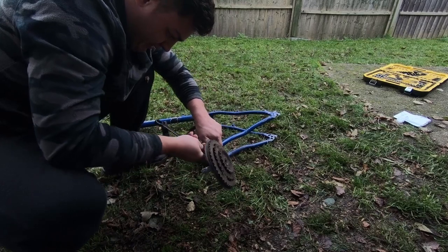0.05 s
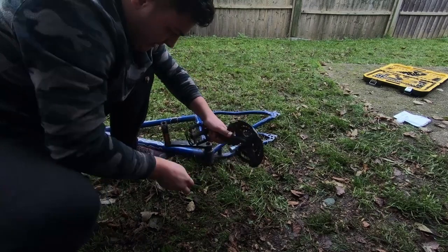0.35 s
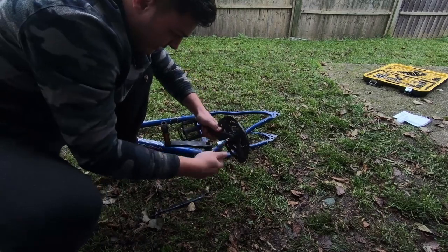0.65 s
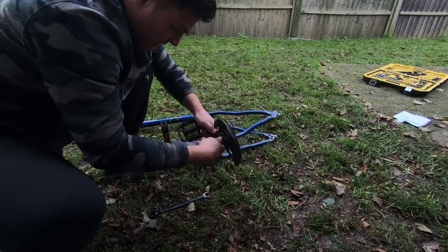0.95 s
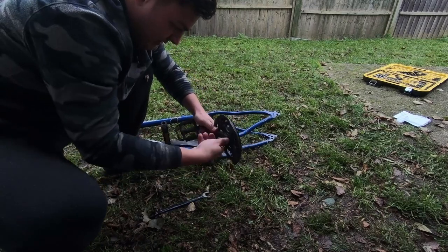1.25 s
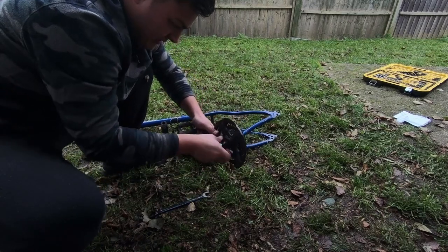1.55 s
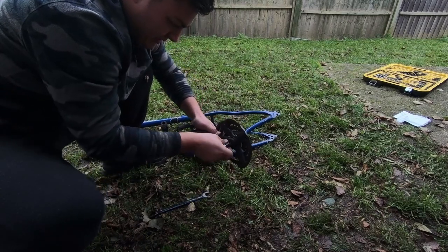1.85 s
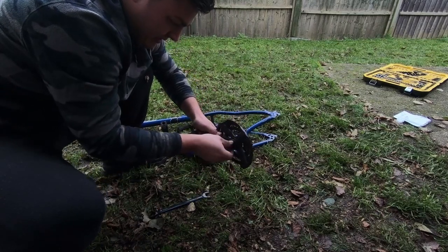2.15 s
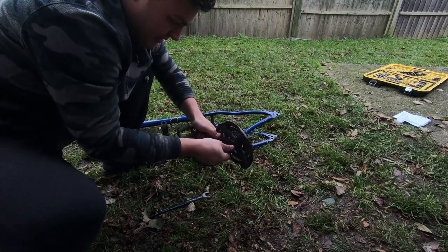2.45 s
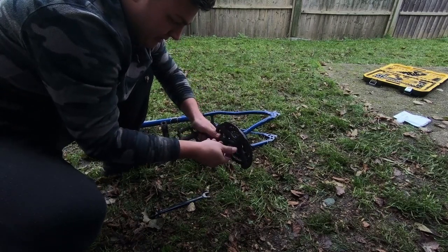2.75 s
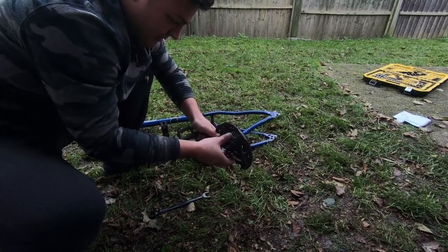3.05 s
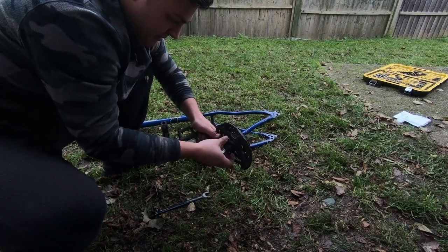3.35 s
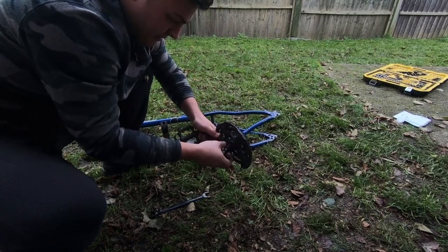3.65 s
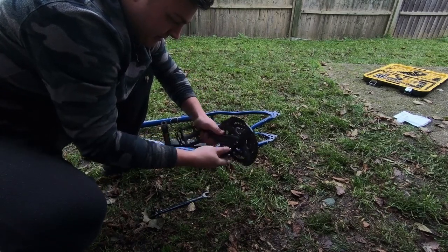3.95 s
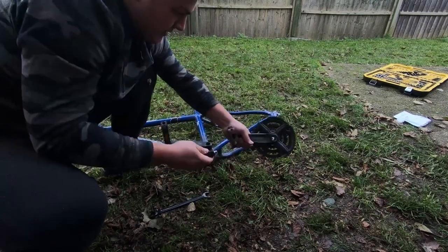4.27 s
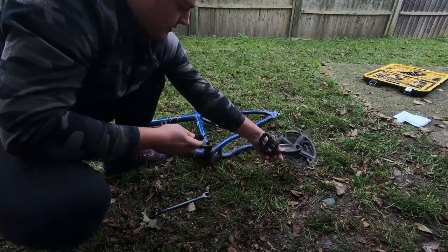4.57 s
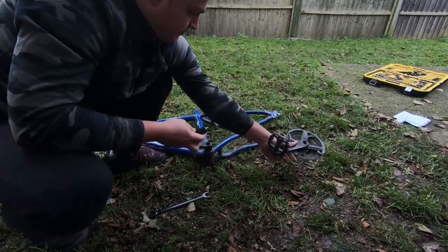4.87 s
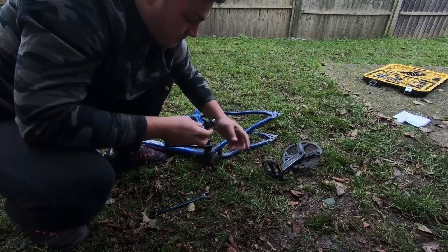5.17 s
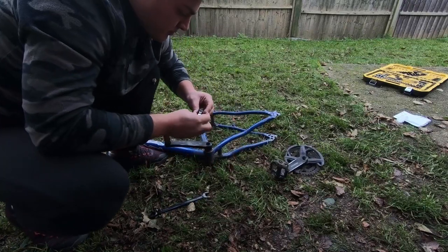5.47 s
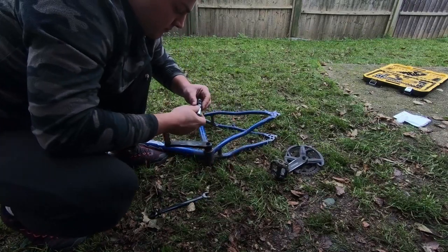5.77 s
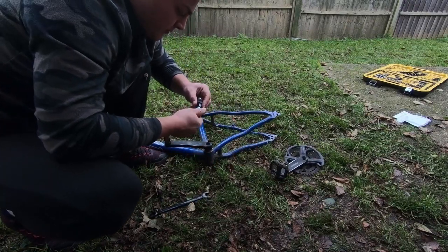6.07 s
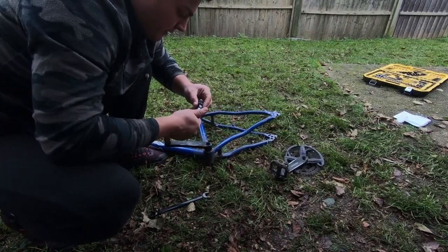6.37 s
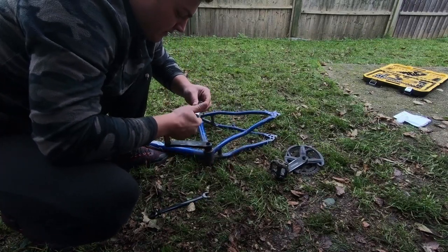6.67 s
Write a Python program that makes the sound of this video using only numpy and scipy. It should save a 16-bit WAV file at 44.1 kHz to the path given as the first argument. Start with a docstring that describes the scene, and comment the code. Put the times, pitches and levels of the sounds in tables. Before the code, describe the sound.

Right at the start, a steel wrench clinks sharply on a bicycle crank and chatters to rest within about 0.2 seconds, the brightest and loudest metal sound. From 0.6 to 4 seconds the crank is wiggled off its axle by hand, giving much quieter, irregular dry knocks and short scrapes, with a clearer ringing ping near 3.8 seconds. Soft, dull bumps on the lawn come around 2 and 3 seconds. After that only a few faint ticks and pings sound, near 5.1, 5.9 and 6.2 seconds. The metalwork is close, with a very slight echo from a yard fence. Throughout, a distant engine drones deeply, slowly rising in pitch and strongest from 2 to 5 seconds, over low traffic rumble that swells around 6 seconds and a faint hiss. Dull wind puffs touch the right side of the microphone near 0.8 seconds and from 5.1 to 5.6 seconds.

```python
"""A steel wrench clinks on a bicycle crank and chatters to rest, each contact a noise burst plus ringing
modes. The loosened crank is worked off its axle by hand: dry knocks, scrapes, pings of the thin
chainring, soft bumps on the lawn. A fence echoes faintly; wind puffs catch the right microphone port.
A distant engine, a firing tone with three overtones, slowly gathers speed over low traffic noise."""
import sys
import numpy as np
from scipy import signal
from scipy.fft import rfft, irfft, next_fast_len
from scipy.io import wavfile
from scipy.ndimage import map_coordinates

SR = 44100
rng = np.random.default_rng(int(sys.argv[2]) if len(sys.argv) > 2 else 0)


def master(y):
    """Save y as 16-bit WAV."""
    cut = np.clip(np.atleast_2d(y).T, -1, 1)
    pcm = np.round(cut * 32767)  # scale
    wavfile.write(sys.argv[1], SR, pcm.astype(np.int16))


N = 300762

# left-right likeness of ambient and of metal sounds: freq_hz, correlation
AMBIENT_COHERENCE = [(60, 0.66), (130, 1), (270, 0.91), (580, 0.02), (1250, 0.038), (2660, 0.43),
                     (5690, 0.26), (12100, 0.09)]
METAL_COHERENCE = [(1000, 0.72), (4000, 1), (6400, 0.72), (9000, 0.51)]
# their balance: freq_hz, left_minus_right_db
AMBIENT_PAN = [(60, 1.5), (110, 1), (200, 1.5), (350, 7.5), (640, 1), (1150, 1.5), (2070, 0.5), (3730, 0.5),
               (6730, -1.5), (12100, -1.5)]
METAL_PAN = [(1000, 2.5), (2000, -4), (4500, 0), (6400, 0), (8500, -5.5), (12000, -4)]


def amp(db):
    """Decibels to gain."""
    return 10 ** (np.asarray(db) / 20)


def unit(x):
    """Scale to rms 1."""
    return x / np.sqrt(np.mean(x ** 2) + 1e-20)


def along(points, hz):
    """Interpolate (freq_hz, value) rows on a log axis."""
    freq_hz, values = np.transpose(points)
    return np.interp(np.log(hz + 1), np.log(freq_hz + 1), values)


def curves(rows):
    """One per-sample curve for each column after time_s."""
    time_s, *columns = np.transpose(rows)
    return [np.interp(np.arange(N) / SR, time_s, column) for column in columns]


def wobble(knots_per_s):
    """Smooth random curve, rms near 1."""
    knots = rng.standard_normal(int(N * knots_per_s / SR) + 4)
    return map_coordinates(knots, [np.arange(N) * knots_per_s / SR])


def rise(t, attack_s):
    """Smooth step from 0 to 1."""
    return 1 - np.exp(-(t / attack_s) ** 2)


def fade(t, t60_s):
    """Exponential decay."""
    return np.exp(-np.log(1000) * t / t60_s)


def bell(t, length_s):
    """Gaussian swell centred on t = 0."""
    return np.exp(-2 * (t / length_s) ** 2)


def swells(rows):
    """Gain curve of summed bells."""
    t = np.arange(N) / SR
    return sum(amp(level_db) * bell(t - centre_s, length_s) for centre_s, length_s, level_db in rows)


def add(track, start_s, sound):
    """Mix a sound in at start_s."""
    part = track[:, max(round(start_s * SR), 0):][:, :sound.shape[1]]
    part += sound[:, :part.shape[1]]


def noise(spectrum, coherence=AMBIENT_COHERENCE, pan=AMBIENT_PAN, size=N, tilt_db_per_oct=0):
    """Coloured stereo noise, rms 1."""
    n_fft = next_fast_len(size)
    hz = np.fft.rfftfreq(n_fft, 1 / SR)
    width_rad = np.arccos(np.clip(along(coherence, hz), -1, 1)) / 2
    colour = amp(along(spectrum, hz) + tilt_db_per_oct * np.log2(hz + 1))
    mid, side = rfft(rng.standard_normal((2, n_fft))) * colour * [np.cos(width_rad), np.sin(width_rad)]
    balance = amp(np.outer([.5, -.5], along(pan, hz)))
    return unit(irfft(np.array([mid + side, mid - side]) * balance, n_fft)[:, :size])


def ring(modes, t, width, scatter_db=1.5):
    """Decaying metal modes; each reaches the two microphones at its own phase."""
    hz, level_db, t60_s = np.transpose(modes)
    struck_db = level_db + scatter_db * rng.standard_normal(len(hz))
    stereo_db = struck_db + np.outer([.5, -.5], along(METAL_PAN, hz))
    apart_rad = width * np.arccos(np.clip(along(METAL_COHERENCE, hz), -1, 1))
    apart_rad *= rng.choice([-1, 1], len(hz))
    phase = rng.uniform(0, 2 * np.pi, len(hz)) + np.outer([.5, -.5], apart_rad)
    waves = np.sin(2 * np.pi * hz[:, None] * t + phase[..., None]) * fade(t, t60_s[:, None])
    return np.sum(amp(stereo_db)[..., None] * waves, axis=1)


def wrench():
    """Faint high ringing, then strikes and bounces that jar the crank puller and ring the steel shank."""
    # start_s, clash_db, ring_db; row 0 is the faint high ringing just before the first strike
    clinks = [(.002, -41, -47.5), (0.0317, -21, -29.5), (.033, -15.5, -24.5), (.0384, -31, -30),
              (.044, -28.5, -24), (.0505, -33, -31), (.054, -32.5, -23.5), (.0583, -31, -25),
              (.085, -48.5, -43), (.098, -51, -42), (.116, -58.5, -45.5), (.17, -62, -52)]
    gap_s, loss_db = .0183, 6
    bounces = [(.067 + k * gap_s, -47 - k * loss_db, -42 - k * loss_db) for k in range(7)]
    # freq_hz, density_db
    clash_spectrum = [(500, -19.5), (1000, -21), (1650, -3), (2000, -10), (2400, -2.5), (2750, -14),
                      (3300, -0.5), (3850, -7), (4600, -1.5), (5130, 3.5), (5650, -7.5), (6300, -2),
                      (6680, 4), (7400, -11.5), (8000, -5.5), (8950, 0), (9700, -7), (10300, -29),
                      (12000, -20), (16000, -43)]
    # freq_hz, level_db, t60_s
    puller_modes = [(1620, -15, .02), (2450, -18, .03), (3290, -14, .02), (4600, -17, .02),
                    (5110, -6, .022), (6560, -4, .024), (6730, -2.5, .018), (8880, -8, .05),
                    (9600, -15, .018)]
    shank_modes = [(1530, -19, .06), (1593, -24, .08), (2299, -13, .06), (2503, -16, .24), (3289, -22, .05),
                   (3430, -23, .1), (4245, -11, .06), (4277, -17.5, .2), (4570, -12.5, .15),
                   (5158, -11, .075), (5995, -14, .16), (6230, -14, .14), (6346, 3, .165), (6386, -8, .24),
                   (6441, -8, .2), (6545, -9, .08), (6590, -13, .09), (6843, -13, .08), (7041, -23, .16),
                   (8495, -20, .08), (8910, -11.5, .115), (9320, -18, .07), (11300, -31, .11),
                   (11870, -30, .09), (12200, -34, .08), (15000, -34, .09)]
    out, t = np.zeros((2, N)), np.arange(SR // 3) / SR
    onset = rise(t, attack_s=.0003)
    burst_decay = fade(t, t60_s=.009) + amp(-15) * fade(t, t60_s=.18)
    damping = amp(-9 * rise(t, attack_s=.011))  # most of the ring dies early
    for start_s, clash_db, ring_db in clinks + bounces:
        burst = burst_decay * noise(clash_spectrum, METAL_COHERENCE, METAL_PAN, len(t))
        clash = amp(-2) * burst + ring(puller_modes, t, width=1.25)
        shank = damping * ring(shank_modes, t, width=1.25)
        add(out, start_s, onset * (amp(clash_db) * clash + amp(ring_db) * shank))
    return out


def yard_echo(x):
    """Fence and house scatter a short tail."""
    # freq_hz, t60_s
    decay_times = [(500, 0.19), (6000, 0.27), (12000, 0.17)]
    hz, t, bands = signal.stft(rng.standard_normal((2, SR // 2)), SR, nperseg=256)
    tail = signal.istft(bands * fade(t, along(decay_times, hz)[:, None]), SR, nperseg=256)[1]
    return signal.fftconvolve(x, tail / np.linalg.norm(tail[0]), axes=1)[:, :N]


def engine():
    """Only four harmonics carry from afar; lumpy pitch and strength smooth out as speed rises."""
    # time_s, firing_hz
    speed = [(0, 32), (.6, 33.7), (1.7, 38.4), (2.55, 41.3), (3.1, 44.2), (4.15, 49.4), (5.1, 53.3),
             (5.6, 54.8), (6.82, 55.2)]
    # firing tone: time_s, level_db
    firing_levels = [(0, -32), (.15, -23), (.38, -21.5), (.52, -30), (.65, -22.5), (.92, -28.5),
                     (1.08, -23), (1.25, -42), (1.42, -43.5), (1.7, -27.5), (2.1, -17), (2.9, -17.5),
                     (3.45, -14), (4.1, -19.5), (4.8, -17.5), (5.15, -23.5), (5.5, -41), (5.95, -24.5),
                     (6.2, -23.5), (6.45, -32), (6.68, -18.5), (6.82, -24.5)]
    # harmonics: time_s, second_db, third_db
    overtone_levels = [(0, -23, -46), (.25, -27.5, -32), (.4, -37, -39.5), (.62, -41, -32.5),
                       (1.02, -42.5, -33.5), (1.15, -36, -38), (1.5, -38, -41.5), (1.75, -33.5, -39),
                       (2.1, -30.5, -36), (2.35, -25, -38), (2.55, -30, -40), (2.7, -32, -44.5),
                       (3.05, -33.5, -56), (3.35, -38.5, -53), (3.8, -42.5, -51), (4.1, -34, -51.5),
                       (4.65, -33.5, -47), (5.05, -35, -52), (5.55, -42, -42), (5.85, -30, -46.5),
                       (6.15, -30.5, -43.5), (6.82, -34.5, -48)]
    # fourth harmonic: centre_s, length_s, level_db
    fourth_swell = [(4.5, 0.64, -52)]
    smoothing_hz, jitter_hz = 4.77, 1.973
    flutter_db, waver_db, surge_db = .5, 1.7, 3.5
    firing_hz, = curves(speed)
    lumpiness = np.exp((firing_hz[0] - firing_hz) / smoothing_hz)
    pitch_hz = firing_hz + jitter_hz * lumpiness * wobble(12)
    phase = 2 * np.pi * np.cumsum(pitch_hz) / SR + np.array([[.1], [-.1]])  # offset between ports
    first = amp(curves(firing_levels)[0] + flutter_db * wobble(9))
    second, third = amp(curves(overtone_levels))
    overtones = [gain * amp(waver_db * wobble(9)) for gain in (second, third, swells(fourth_swell))]
    surge = amp(surge_db * lumpiness * wobble(22))
    return surge * sum(np.sqrt(2) * gain * np.sin(k * phase + rng.uniform(0, 2 * np.pi))
                       for k, gain in enumerate([first] + overtones, 1))


def traffic():
    """Heavy vehicles rumble; one level curve drives the far rush of tyres and its airy top."""
    # time_s, level_db
    rumble_levels = [(0, -30), (.7, -30), (1.15, -31.5), (1.37, -29), (1.7, -29.5), (2.1, -28),
                     (2.6, -31.5), (3.0, -31.5), (3.45, -36.5), (4.1, -32), (4.7, -29), (5.15, -29.5),
                     (5.6, -26), (6.1, -25.5), (6.45, -26.5), (6.82, -28)]
    rush_levels = [(0.25, -64), (1.06, -64.5), (1.52, -61.5), (1.88, -60.5), (2.39, -65), (3.86, -67),
                   (4.78, -63.5), (5.42, -64), (6.7, -62.5)]
    # freq_hz, density_db
    rumble_spectrum = [(15, -10), (28, -4.5), (50, 2.5), (70, -2.5), (95, -5.5), (120, -9), (150, -13),
                       (175, -21.5), (210, -19), (250, -34), (400, -53), (1500, -140)]
    tyre_spectrum = [(100, -27), (205, 3), (260, -2), (360, -0.5), (450, -8.5), (560, -17), (900, -27),
                     (2000, -62.5), (6000, -120)]
    air_spectrum = [(200, -21), (600, 1), (1000, 0.5), (1600, 0), (2150, -2.5), (2550, -9), (3150, -10),
                    (4200, -21.5), (8000, -46.5), (13000, -76)]
    rumble_coherence = [(30, 1), (70, .98), (130, 1), (300, .63)]  # freq_hz, correlation
    rumble_db = curves(rumble_levels)[0] + 1.7 * wobble(17)
    rush_db, = curves(rush_levels)
    rumble = amp(rumble_db) * noise(rumble_spectrum, rumble_coherence)
    tyres = amp(rush_db + 10 + 1.3 * wobble(4)) * noise(tyre_spectrum)
    air = amp(rush_db + 2.5 + .2 * wobble(3.7)) * noise(air_spectrum)
    return rumble + tyres + air


def outdoor_hiss():
    """Faint high hiss, drifting in level."""
    # time_s, level_db
    levels = [(.3, -67.5), (1.1, -69.5), (1.7, -66.5), (2.4, -68.5), (3.2, -69), (3.9, -68.5), (4.6, -64.5),
              (5.4, -66), (6.1, -66.5), (6.7, -68.5)]
    # freq_hz, density_db
    spectrum = [(1800, -30.5), (2600, -4.5), (3150, 2.5), (3800, -5), (4600, -5), (6200, -0.5),
                (7200, -5.5), (8500, -18.5), (11000, -24), (13000, -42.5)]
    return amp(curves(levels)[0]) * noise(spectrum)


def axle_scrapes():
    """Each wiggle drags the crank along the axle: a swell of tiny uneven slips."""
    # centre_s, length_s, level_db, tilt_db_per_oct
    strokes = [(0.589, 0.031, -60.5, 7.5), (1.501, 0.091, -62.5, 2.5), (1.931, 0.26, -67.5, 5.5),
               (2.25, 0.1, -64.5, 0.5), (2.613, 0.042, -63, -2), (2.983, 0.067, -61, 0),
               (3.336, 0.032, -59, -1.5), (3.67, .056, -67, -1), (5.089, 0.024, -57.5, 4.5),
               (5.849, 0.025, -61, -2), (6.22, .055, -67.5, 3.5), (6.528, 0.04, -66.5, 3)]
    # steel on steel: freq_hz, density_db
    rasp_spectrum = [(600, -17), (1500, -1.5), (1950, 5), (2350, -3.5), (2900, 4.5), (3500, -3), (4300, -3),
                     (4850, -5.5), (5400, 2.5), (5950, -3.5), (6400, -1.5), (7300, -9.5), (7800, -7.5),
                     (8400, -21), (12000, -35.5), (16000, -59.5)]
    slip_db, slips_per_s = 2.3, 450
    out, t = np.zeros((2, N)), np.arange(-SR // 3, SR // 3) / SR
    for centre_s, length_s, level_db, tilt_db_per_oct in strokes:
        rasp = noise(rasp_spectrum, METAL_COHERENCE, METAL_PAN, len(t), tilt_db_per_oct)
        add(out, centre_s + t[0], amp(level_db) * bell(t, length_s) * rasp)
    return out * unit(amp(slip_db * wobble(slips_per_s)))


def crank_knocks():
    """The hand-damped crank knocks drily on its axle, brighter when harder; the chainring sings on."""
    # start_s, contact_db, ring_re_contact_db, spot_hz, spot_db
    knocks = [(.604, -44, -20, 2180, 17), (.6148, -42.5, -14, 5970, 7), (.8028, -50.5, -18, 2100, 12),
              (.8145, -58, -12, 6200, 14), (1.249, -55.5, -18, 2970, 4), (1.477, -54, -17, 3100, 7),
              (1.5295, -51.5, -11, 5300, 9), (1.781, -55, -20, 1900, 6), (1.851, -57, -18, 3300, 3),
              (1.863, -57, -15, 5600, 6), (1.908, -55, -18, 3100, 5), (1.959, -51.5, -20, 2010, 8),
              (1.984, -57, -18, 6500, 6), (2.273, -58, -18, 3000, 4), (2.503, -56, -18, 3000, 5),
              (2.582, -58, -18, 2000, 5), (2.618, -56.5, -17, 2000, 5), (2.6525, -54.5, -15, 2930, 5),
              (2.963, -54.5, -14, 2010, 8), (2.985, -53, -13, 5450, 9), (3.344, -52, -12, 1930, 11),
              (3.361, -57.5, -18, 2900, 9), (3.5835, -54.5, -20, 2900, 8), (3.7913, -42, -0.5, 5200, 8),
              (3.803, -54, -6, 8000, 18), (3.817, -61, -5, 6200, 9), (3.9025, -51, -24, 2970, 12),
              (3.9625, -58, -16, 5800, 5), (5.093, -56, -14.5, 6000, 3), (5.851, -55, -15, 3720, 6)]
    # contact noise: freq_hz, density_db
    knock_spectrum = [(400, -21.5), (1000, -3.5), (1500, -0.5), (2150, 1.5), (2550, -1.5), (3100, 3),
                      (4200, -4.5), (5900, -6), (7400, -9), (8600, -22), (10200, -26), (13000, -44.5),
                      (16000, -57.5)]
    # crank and axle: freq_hz, level_db, t60_s
    crank_modes = [(1500, -5, .035), (2990, -2.5, .04), (3270, -8, .06), (3850, -10, .025),
                   (4620, -11, .05), (5100, -3.5, .068), (5290, 3, .036), (5500, -6, .035),
                   (6056, -1.5, .072), (6220, -4.5, .08), (7386, -11, .08), (7850, -6, .08),
                   (8296, -12, .08), (8700, -15, .06), (9750, -14, .05), (10250, -16, .05),
                   (12150, -14, .045), (12850, -23, .03)]
    out, t = np.zeros((2, N)), np.arange(SR // 4) / SR
    onset = rise(t, attack_s=.00029)
    knock_decay = fade(t, t60_s=.031) + amp(-23) * fade(t, t60_s=.28)
    damping = amp(-7 * rise(t, attack_s=.0065))
    hz, spot_half_width_hz = np.geomspace(100, SR / 2, 400), 210
    for start_s, contact_db, ring_re_contact_db, spot_hz, spot_db in knocks:
        # each struck spot favours one band
        peak_db = spot_db / (1 + ((hz - spot_hz) / spot_half_width_hz) ** 2)
        spectrum = np.column_stack([hz, along(knock_spectrum, hz) + peak_db])
        tilt_db_per_oct = .86 * (contact_db + 51)
        burst = noise(spectrum, METAL_COHERENCE, METAL_PAN, len(t), tilt_db_per_oct)
        knock = amp(.5) * knock_decay * burst
        body = amp(ring_re_contact_db + 3) * damping * ring(crank_modes, t, width=1.7)
        ping = amp(-26.5) * chainring(t, width=1.3)
        add(out, start_s, amp(contact_db) * onset * (knock + body + ping))
    return out


def chainring(t, width):
    """The thin chainring rings with a close pair of modes."""
    # freq_hz, level_db, t60_s
    modes = [(7815, -10, .13), (7770, -1, .15)]
    return ring(modes, t, width)


def ground_bumps():
    """Frame and knees shift on soft ground: dull thuds."""
    # centre_s, length_s, level_db
    bumps = [(.63, 0.055, -47.5), (1.95, 0.058, -41.5), (2.025, 0.038, -34), (2.08, 0.035, -40),
             (2.97, 0.085, -44.5)]
    # freq_hz, density_db
    thud_spectrum = [(60, -12), (150, -6.5), (200, 4.5), (230, -1.5), (275, -26), (320, -21.5), (420, -17),
                     (505, -16.5), (570, -41.5), (3000, -120)]
    return swells(bumps) * noise(thud_spectrum)


def wind():
    """Turbulence at the right microphone port: a dull flutter the left hardly gets."""
    # centre_s, length_s, level_db
    puffs = [(.67, .06, -21), (.82, .11, -20.5), (1.0, .073, -27), (5.11, .045, -18), (5.19, .1, -20),
             (5.39, .1, -18.5), (5.58, .13, -26)]
    # freq_hz, density_db
    buffet_spectrum = [(15, -7), (35, -14), (65, 2.5), (85, 0), (120, -13.5), (170, -27), (260, -45),
                       (600, -81), (2000, -140)]
    buffet = noise(buffet_spectrum, coherence=[(50, .028)], pan=[(50, .0019)])
    return swells(puffs) * buffet * amp([[-18], [0]])


def chainring_brushes():
    """Light rubs keep the chainring's highest modes shimmering."""
    # centre_s, length_s, level_db
    rubs = [(1.86, .08, -71), (2.0, .09, -65), (2.99, .05, -73), (3.345, .025, -71), (5.86, .035, -67)]
    # freq_hz, density_db
    shimmer_spectrum = [(5500, -24.5), (6900, -3), (7450, -6.5), (7730, 1), (7980, -9.5), (8400, -42),
                        (12000, -89)]
    return swells(rubs) * noise(shimmer_spectrum, METAL_COHERENCE, METAL_PAN)


def chainring_pings():
    """Taps on the rim sound the chainring alone."""
    # start_s, level_db
    taps = [(3.7145, -57.5), (3.803, -55), (3.9635, -61.5), (6.195, -58.5), (6.235, -63)]
    out, t = np.zeros((2, N)), np.arange(SR // 4) / SR
    for start_s, level_db in taps:
        add(out, start_s, amp(level_db) * rise(t, attack_s=.0018) * chainring(t, width=.65))
    return out


def traffic_hum(pitch_hz=68.5, waver_hz=.69):
    """A wavering low tone and its octave swell once in the traffic."""
    # centre_s, length_s, level_db
    swell = [(6.25, 0.75, -26.5)]
    phase = 2 * np.pi * np.cumsum(pitch_hz + waver_hz * wobble(6.5)) / SR
    return swells(swell) * (np.sin(phase) + amp(-6.5) * np.sin(2 * phase))


def scene():
    """Close metalwork and its echo over distant sounds."""
    tool = wrench()
    bicycle = crank_knocks() + axle_scrapes() + chainring_brushes() + chainring_pings()
    echo = yard_echo(amp(-13.5) * tool + amp(-10.5) * bicycle)
    near = tool + bicycle + echo + ground_bumps() + wind()
    return near + engine() + traffic_hum() + traffic() + outdoor_hiss()


def record(dry):
    """Click-free fade-in, then a brick-wall low-pass."""
    cutoff_hz = 16400
    eased = dry * rise(np.arange(N) / SR, attack_s=.006)
    n_fft = next_fast_len(N + SR // 2)
    passband = np.fft.rfftfreq(n_fft, 1 / SR) < cutoff_hz
    return irfft(rfft(eased, n_fft) * passband, n_fft)[:, :N]


dry = scene()
out = record(dry)
master(out)
```